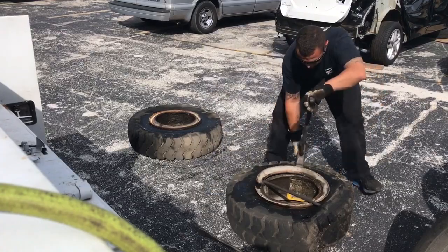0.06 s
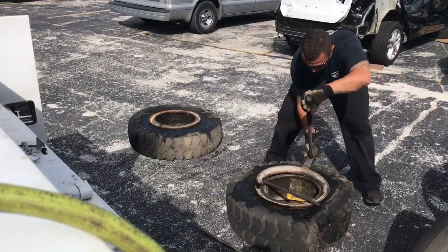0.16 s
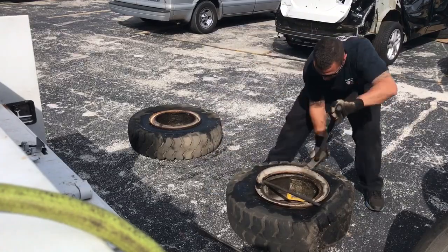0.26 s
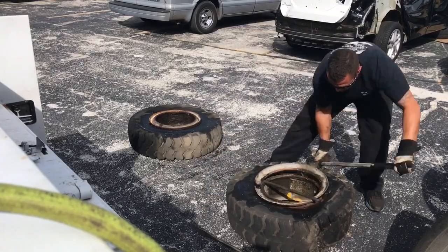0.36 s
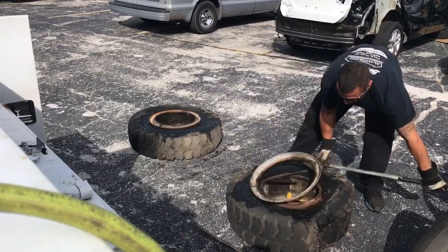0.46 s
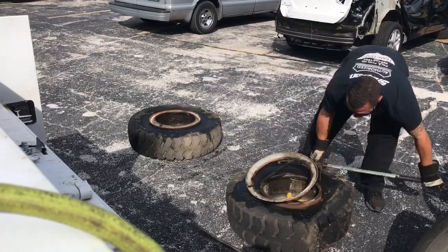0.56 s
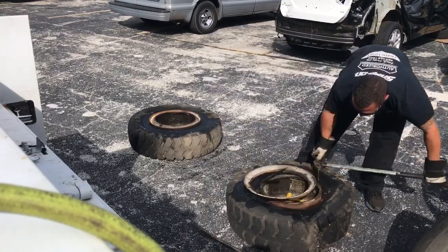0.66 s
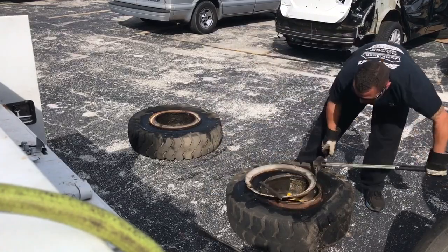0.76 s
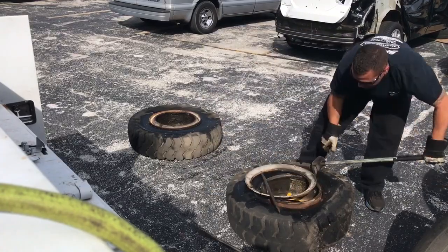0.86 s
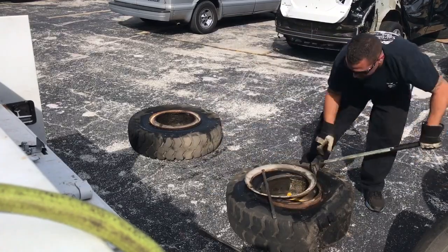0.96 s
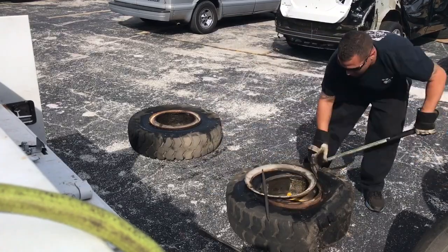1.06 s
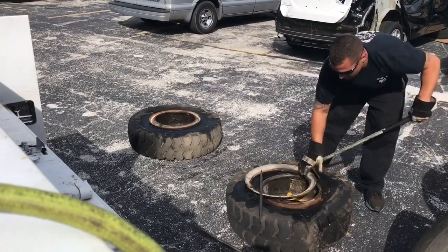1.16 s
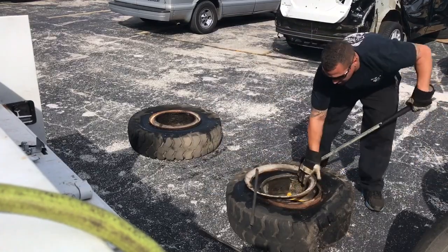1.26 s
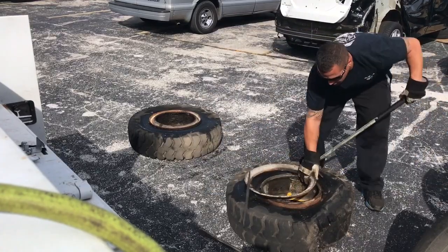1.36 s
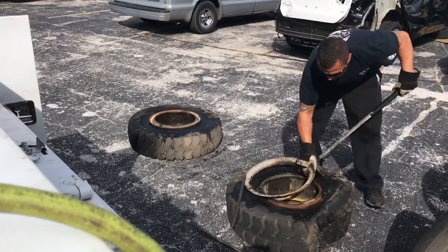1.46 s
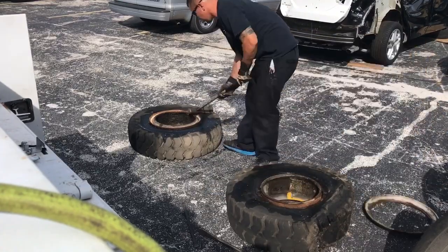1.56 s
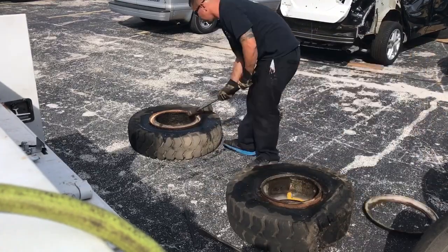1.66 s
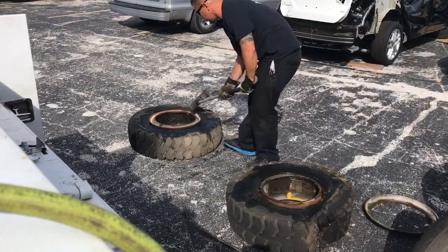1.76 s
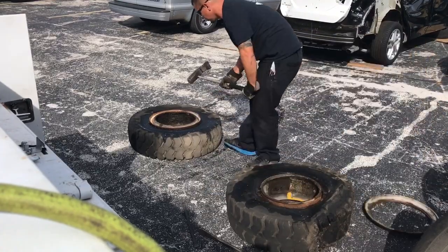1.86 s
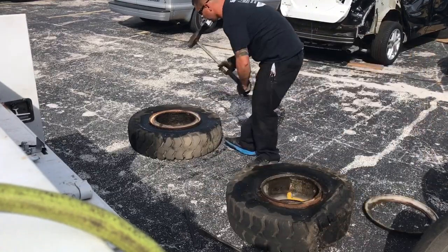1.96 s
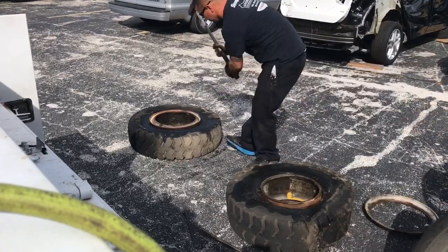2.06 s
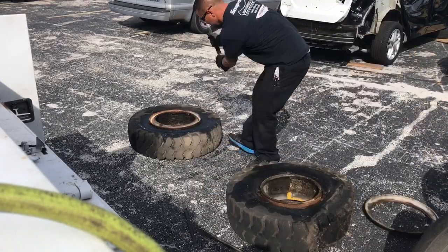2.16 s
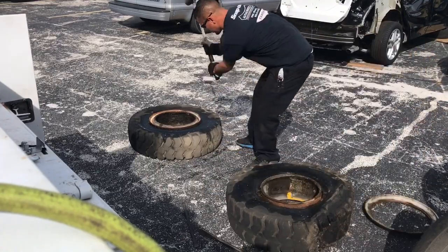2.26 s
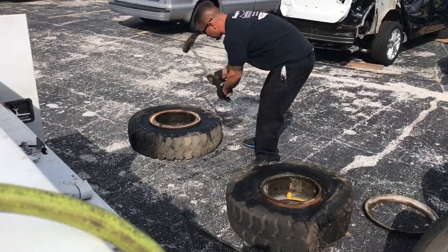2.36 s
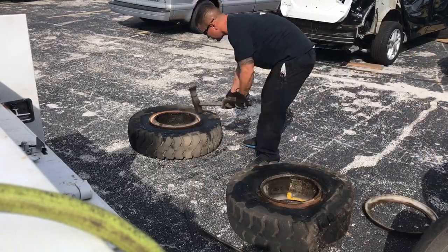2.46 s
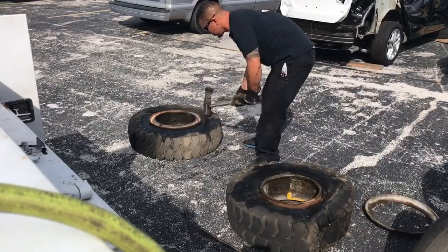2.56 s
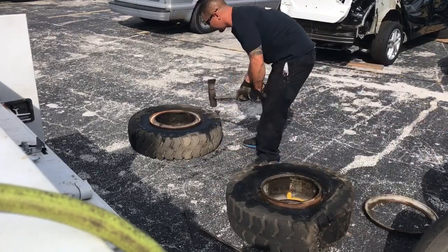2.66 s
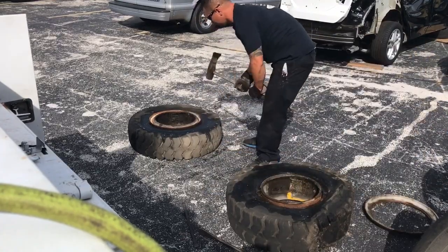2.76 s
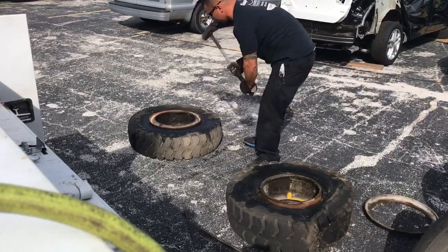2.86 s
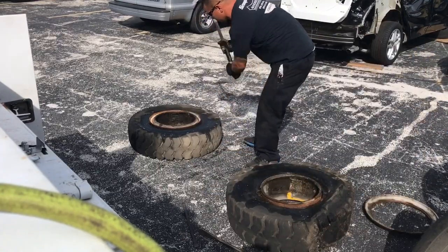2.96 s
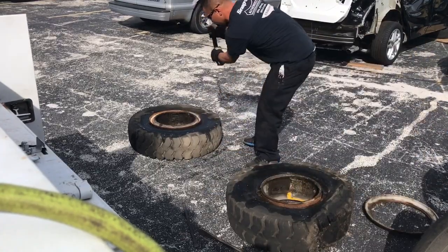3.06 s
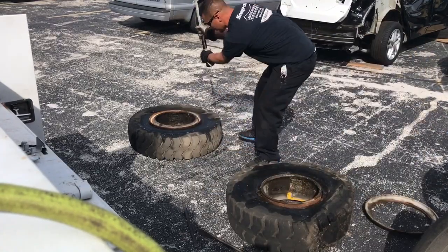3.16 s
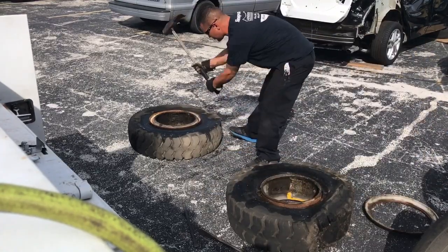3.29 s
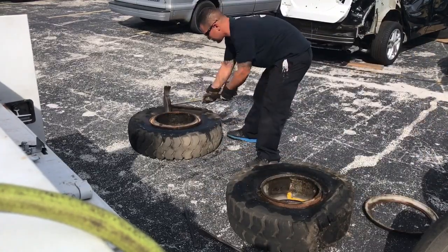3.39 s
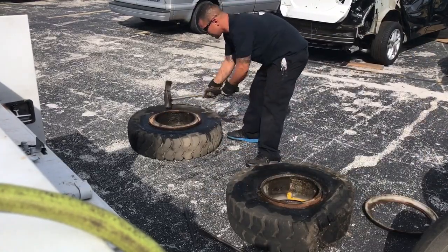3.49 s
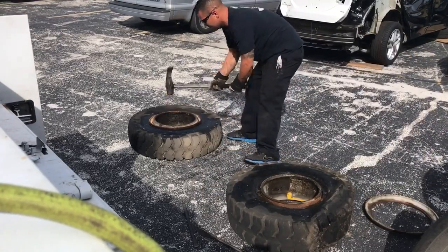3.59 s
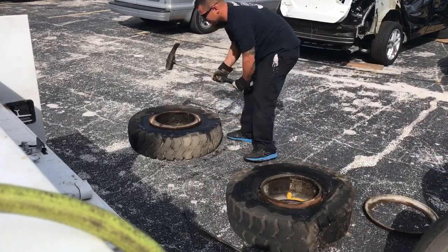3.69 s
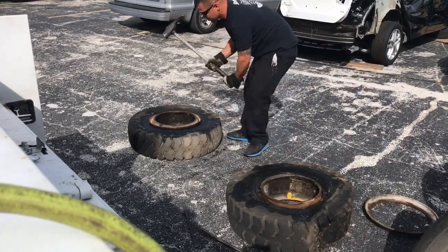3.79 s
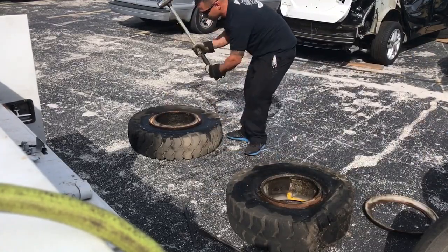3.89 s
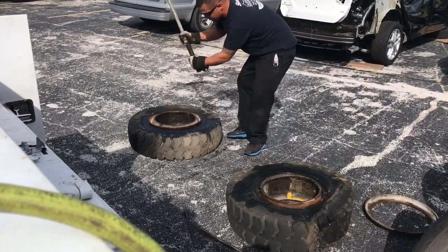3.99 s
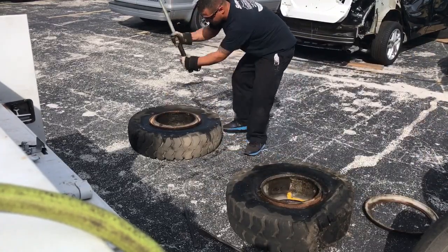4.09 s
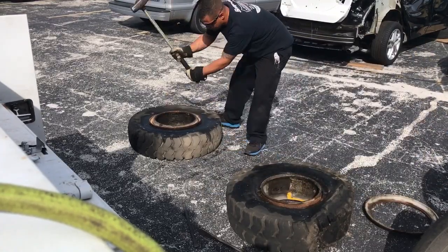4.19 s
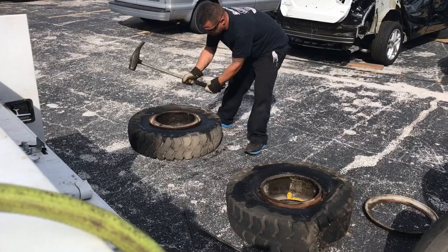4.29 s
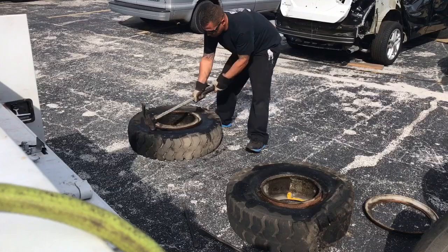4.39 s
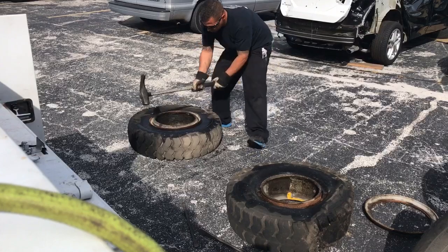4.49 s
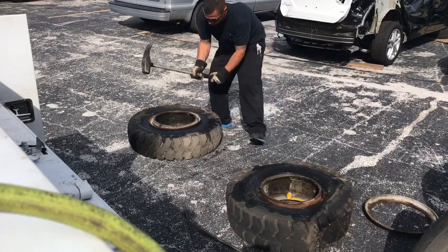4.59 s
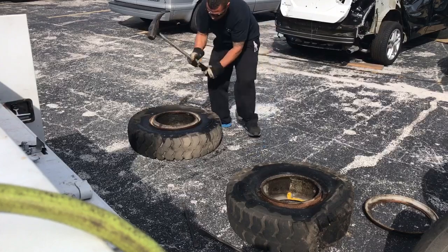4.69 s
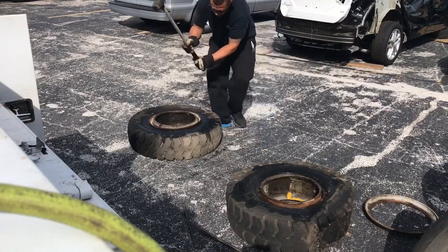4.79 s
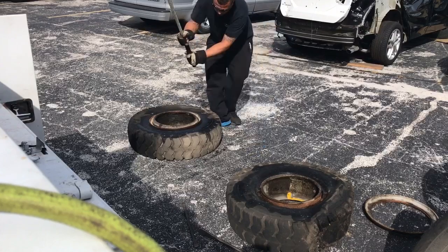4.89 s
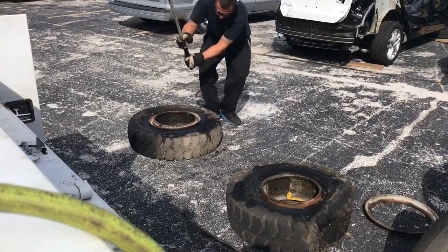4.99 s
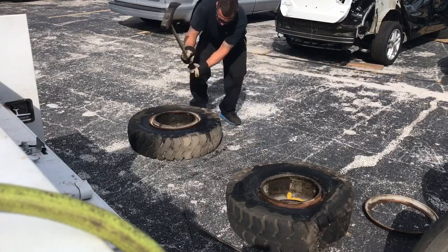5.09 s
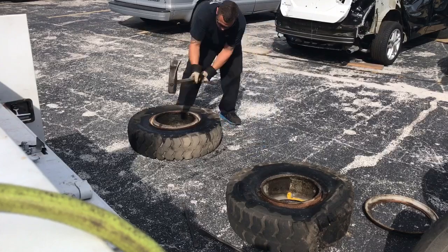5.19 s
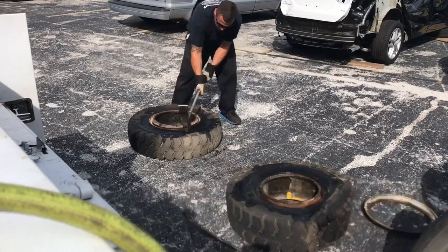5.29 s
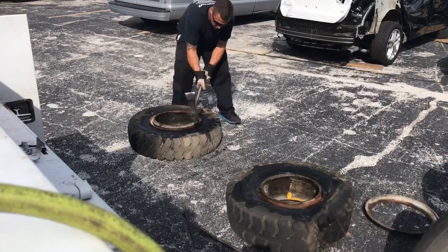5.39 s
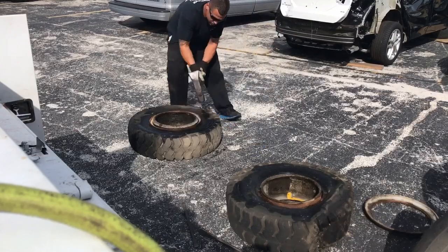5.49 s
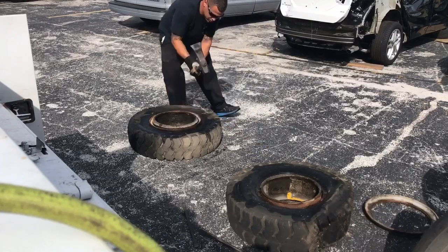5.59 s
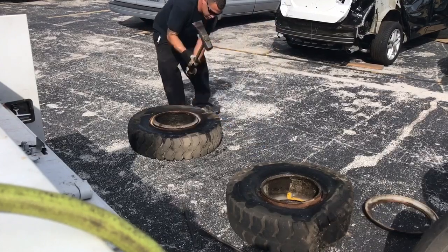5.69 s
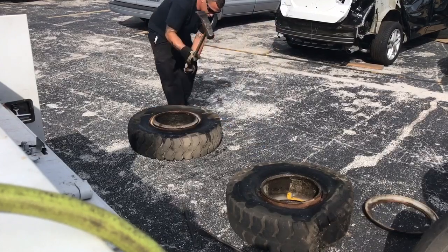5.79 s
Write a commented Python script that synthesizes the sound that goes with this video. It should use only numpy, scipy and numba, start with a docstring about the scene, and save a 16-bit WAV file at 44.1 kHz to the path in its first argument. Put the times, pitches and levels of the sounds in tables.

```python
"""A steel iron pries the lock ring off a truck wheel, close by in an asphalt yard: knocks, a slip, a
rubbing squeal and ringing clangs that stop abruptly. Then a sledge strikes a second tyre's bead four
times: crack, tyre thump and bounce, rim ring and echoes off cars and buildings. Wind buffets the single
phone microphone over distant traffic, and its limiter squeezes the blows."""
import sys
import numpy as np
from scipy import signal
from scipy.fft import rfft, irfft
from scipy.io import wavfile
from scipy.ndimage import uniform_filter1d
from numba import njit

SR = 44100
rng = np.random.default_rng(int(sys.argv[2]) if len(sys.argv) > 2 else 0)


def to_wav(s):
    """Save 16-bit WAV."""
    ch = np.atleast_2d(s).T  # columns
    pcm = np.round(np.clip(ch, -1, 1) * 32767)  # PCM
    wavfile.write(sys.argv[1], SR, pcm.astype(np.int16))


N = 257544
CLANGS_END_S = 1.639

# sledge blows: (time [s], level [dB], thump gain [dB], thump centre [Hz], rim gain [dB], head gain [dB],
# crack centre [Hz], chatter [s], first bounce level [dB], second bounce level [dB])
BLOWS = [(2.539, -11, 6, 148.4, -36.5, -39, 2970, 0.013, -23.5, -29),
         (3.491, -9.5, -1.5, 208, -35.5, -41, 3860, 0.014, -24.5, -33),
         (4.4762, -10.5, -8.5, 129, -29.5, -47, 2560, 0.015, -16.5, -34),
         (5.356, -9.5, -4.5, 77, -27, -44.5, 3170, 0.018, -26, -33)]


def undb(db):
    """Decibels to gain."""
    return 10 ** (np.asarray(db) / 20)


def level(x, db):
    """Scale to an rms level."""
    return x * undb(db) / np.sqrt(np.mean(x ** 2))


def band(x, hz, octaves):
    """Band-pass around a centre."""
    edges = np.clip([hz * 2 ** (-octaves / 2), hz * 2 ** (octaves / 2)], 10, .45 * SR)
    return signal.sosfilt(signal.butter(3, edges, "bandpass", fs=SR, output="sos"), x)


def strike(pitches, modes, times, peak_db, centre_hz, slope_db, scatter_db,
           wobble=0., wobble_hz=30., stop=N / SR):
    """Blows kick each mode, slope_db less per squared octave off centre; loose contact makes it waver."""
    out = np.zeros(N)
    at = (np.asarray(times) * SR).astype(int)
    chance = rng.standard_normal((len(at), 2 * len(modes)))
    span = slice(at[0], int(stop * SR))
    steps = np.arange(span.stop - at[0]) * wobble_hz / SR
    for k, (hz, (db, t60)) in enumerate(zip(pitches, modes)):
        kick = np.zeros(N)
        colour_db = scatter_db * chance[:, 2 * k + 1] - slope_db * np.log2(hz / centre_hz) ** 2
        kick[at] = np.sign(chance[:, 2 * k]) * undb(db + peak_db + colour_db)
        r = 1000 ** (-1 / (max(t60, .01) * SR))
        w = 2 * np.pi * hz / SR
        ring = signal.lfilter([0, r * np.sin(w)], [1, -2 * r * np.cos(w), r * r], kick[span])
        if wobble:
            ring *= np.interp(steps, np.arange(1024), 1 + wobble * rng.standard_normal(1024))
        out[span] += ring
    return out


def add_burst(out, s, db, hz, octaves, rise, t60, hold=0.):
    """Mix in a burst of band noise: short rise, optional hold, exponential fall."""
    t = np.arange(SR) / SR
    noise = level(band(rng.standard_normal(SR), hz, max(octaves, .2)), db)
    attack = 1 - np.exp(-t / max(rise, 1e-4))
    decay = 1000 ** (-np.maximum(t - hold, 0) / max(t60, .005))
    i = int(s * SR)
    out[i:i + SR] += (noise * attack * decay)[:N - i]


def bursts(rows):
    """One noise burst for each row."""
    out = np.zeros(N)
    for row in rows:
        add_burst(out, *row)
    return out


def walk(rate):
    """Random levels held 1 / rate s and smoothed twice; spread near 1."""
    k = int(SR / rate)
    held = np.repeat(rng.standard_normal(N // k + 1), k)
    return 1.3 * uniform_filter1d(uniform_filter1d(held, k), k)[:N]


@njit
def follow(x, release_s):
    """Peak follower: jumps up at once, sinks slowly."""
    release = np.exp(-1 / (release_s * SR))
    peak, envelope = 0., np.empty(len(x))
    for i in range(len(x)):
        peak = max(abs(x[i]), peak * release)
        envelope[i] = peak
    return envelope


def wind():
    """Gusts buffet the microphone in two low bands that throb quickly."""
    # gusts: (time [s], rumble level [dB], flutter level [dB])
    gusts = [(0, -40.5, -54.5), (.3, -54.5, -59.5), (.38, -35, -42), (.7, -39, -42.5), (1.15, -40.5, -43),
             (1.4, -38.5, -41.5), (1.6, -47.5, -52.5), (2.401, -53, -60), (2.7, -46, -49.5),
             (3.099, -46, -61.5), (3.8, -44, -54), (4.249, -50.5, -61.5), (4.899, -42, -62.5),
             (5.4, -48, -57), (5.7, -40, -52), (5.84, -43.5, -54)]
    s, rumble_db, flutter_db = np.transpose(gusts)
    t = np.arange(N) / SR
    rumble = level(band(rng.standard_normal(N), 71.2, 1.55), 0)
    rumble *= undb(np.interp(t, s, rumble_db) + 1.8 * walk(23))
    flutter = level(band(rng.standard_normal(N), 183.6, 1.5), 0)
    flutter *= undb(np.interp(t, s, flutter_db) + 4.5 * walk(30))
    return rumble + flutter


def traffic():
    """Far-off traffic blends into a wash of noise that slowly eases."""
    # traffic spectrum: (frequency [Hz], relative density [dB])
    spectrum = [(88, -19.5), (150, 4.5), (182, -4), (254, -12.5), (334, -4.5), (431, -10.5), (624, -3),
                (1390, -6.5), (2310, -18), (4000, -24), (5050, -31.5), (9630, -34.5), (16000, -38)]
    # slow drift: (time [s], gain [dB])
    drift = [(0.0, 3.5), (5.84, -0.8)]
    hz, db = np.transpose(spectrum)
    bins_hz = np.fft.rfftfreq(N, 1 / SR) + 1
    shape = undb(np.interp(np.log(bins_hz), np.log(hz), db))
    drift_db = np.interp(np.arange(N) / SR, *np.transpose(drift)) + .4 * walk(25)
    wash = irfft(rfft(rng.standard_normal(N)) * shape, N)
    return level(wash, -51) * undb(drift_db)


def contacts():
    """The tools knock, slip, tick and scuff: short contacts without a ring."""
    # dull knocks of iron on tyre: (time [s], level [dB], centre [Hz])
    knocks = [(.0243, -30.5, 1140), (.3428, -25, 1650), (1.667, -39, 2100)]
    # the iron scrapes, then slips off with a crack:
    # (time [s], level [dB], centre [Hz], width [octaves], rise [s], t60 [s])
    slip = [(.441, -25, 2520, 1.9, 0.0017, 0.17), (.455, -14.5, 3460, 3.3, 0.01, 0.13),
            (.4655, -7.5, 2230, 2.8, 0.0026, 0.082)]
    # soft scuffs as the sledge is raised, and faint ticks: (time [s], level [dB], centre [Hz])
    scuffs = [(2.069, -51, 7930), (2.105, -48.5, 8000), (2.39, -54, 6900), (3.91, -48.5, 5960),
              (4.912, -39, 6000)]
    ticks = [(2.265, -50.5, 7070), (3.196, -54, 8610), (4.131, -37, 4330), (4.185, -58.5, 2940),
             (5.11, -57, 3870)]
    # double tick just ahead of each blow: (lead [s], gain on the blow [dB])
    lead_ticks = [(.0228, -27.5), (0.0093, -28.5)]
    out = bursts(slip)
    for s, db, *_ in BLOWS:
        for lead, gain_db in lead_ticks:
            add_burst(out, s - lead, db + gain_db, hz=3500, octaves=1.5, rise=.0006, t60=.038)
    for knock in knocks:
        add_burst(out, *knock, octaves=2.15, rise=.00034, t60=.046)
    for tick in ticks:
        add_burst(out, *tick, octaves=1.8, rise=.00027, t60=.02)
    for scuff in scuffs:
        add_burst(out, *scuff, octaves=2.2, rise=.012, t60=.1)
    return out


def thuds():
    """Scattered low thuds, and the tyre bouncing twice after each blow."""
    # low thuds: (time [s], level [dB], centre [Hz], t60 [s])
    low_thuds = [(0.031, -28.5, 152, 0.11), (.36, -28.5, 77, .3), (.465, -22, 324, 0.15),
                 (.51, -25, 210, 0.41), (0.771, -24.5, 347, 0.44), (1.761, -25.5, 297, 0.031),
                 (3.07, -32, 109, 0.22), (3.396, -21, 128.4, 0.044), (3.966, -24.5, 137, 0.091),
                 (4.419, -25, 70.5, 0.096), (5.18, -17, 72.4, 0.037), (5.821, -37, 150, .1)]
    # tyre bounces: (delay [s], centre [Hz], width [octaves], rise [s], t60 [s])
    bounces = [(0.087, 185, 2.06, 0.0059, 0.086), (.228, 96, 2.06, 0.0049, 0.27)]
    octaves, rise_cycles = 1.74, .6
    out = bursts((s, db, hz, octaves, rise_cycles / hz, t60) for s, db, hz, t60 in low_thuds)
    for s, *_, first_db, second_db in BLOWS:
        for db, (delay, *shape) in zip((first_db, second_db), bounces):
            add_burst(out, s + delay, db, *shape)
    return out


def yard(x):
    """The direct sound, then its echoes scattered off cars and buildings."""
    # echoes: (delay [s], level [dB], centre [Hz], rise [s], t60 [s])
    echoes = [(.012, -52, 2337, .004, 0.26), (0.083, -65.5, 2000, 0.0076, 0.34),
              (0.189, -69, 2223, 0.1, .9), (0.212, -66.5, 4090, 0.0054, 0.15)]
    response = bursts((delay, db, hz, 3.0, rise, t60) for delay, db, hz, rise, t60 in echoes)
    return x + signal.fftconvolve(x, response[:SR + SR // 4])[:N]


def clangs():
    """Iron and lock ring sound together; the ring settles on tyre and glove, choking earlier hits."""
    # lock ring bending in its plane: (pitch [Hz]) and (level [dB], t60 [s])
    bend_hz = [738, 1114, 1365, 1491, 1712, 1933, 2007, 2207, 2272, 2525, 2638, 3138, 3680, 4420, 5114,
               5609, 5805, 5862, 6842, 7111, 8145, 9135, 9986, 12700]
    bend_modes = [(-7, 0.79), (-3.5, 0.47), (-4.5, 0.97), (1.5, 0.47), (1.5, 0.36), (-15.5, 1.2),
                  (-22.5, 1.5), (-21.5, 0.59), (-17, 0.53), (-5.5, 0.13), (-20.5, 1.8), (-11, 0.57),
                  (-8, 0.39), (-10, .6), (-17, 0.29), (-20.5, .3), (-16, 1.4), (-18, 0.63), (-26, 0.22),
                  (-26, 0.21), (-25.5, 0.24), (-23.5, .5), (-19.5, .3), (-27, .3)]
    # lock ring bending and twisting across its plane: (pitch [Hz]) and (level [dB], t60 [s])
    twist_hz = [2132, 2377, 3273, 3757, 4085, 4744, 6336, 6572, 7811, 8479, 8764, 9375, 9755, 11270]
    twist_modes = [(-9, 0.24), (-5, 0.61), (-2, 0.076), (-9, 0.12), (-10, 0.23), (0.5, 0.13), (-11.5, 0.27),
                   (-16, 0.55), (-32, .3), (-35, .4), (-27.5, 0.35), (-15.5, 0.88), (-21, 0.33), (-23, .3)]
    # tyre iron: (pitch [Hz]) and (level [dB], t60 [s])
    iron_hz = [1067, 2810, 4233, 4484, 4608, 5012, 5276, 6150, 6910, 7160, 7407, 7520, 7957, 8581, 9001,
               9658, 10400, 10830, 11390, 11930, 13250, 13730, 14300, 15370, 15630]
    iron_modes = [(-5, 2.9), (4, 0.28), (-4, 0.67), (-1.5, 0.39), (-0.5, 0.35), (-15.5, 0.2), (-0.5, 0.59),
                  (-6.5, 0.15), (-12, 0.69), (-8.5, 0.33), (-13.5, .4), (-7, 0.36), (-24, 0.15),
                  (-12, 0.13), (-15, .5), (-12, .3), (-29, 0.1), (-25.5, 0.16), (-14.5, 1.2), (-16, 0.44),
                  (-21.5, .4), (-14.5, 1.1), (-27, 0.55), (-23, 0.3), (-16, .9)]
    # the iron jingles and rebounds on the ring: (time [s], level [dB], brightest [Hz])
    taps = [(0.172, -51, 4160), (.2, -52, 4180), (0.243, -49.5, 4160), (0.263, -53.5, 4000),
            (.295, -50.5, 3880), (0.414, -38, 5000), (.998, -18.5, 3000), (1.052, -18, 3240),
            (1.097, -25, 3000), (1.137, -32, 3490), (1.252, -33.5, 3000), (1.388, -36, 2860)]
    # hard contacts: (time [s], level [dB], bend gain [dB], twist gain [dB], iron gain [dB], # brightest [Hz],
    # crack gain [dB])
    hard_hits = [(0.47, -31, -7.5, 7, -15, 2164, 2), (0.77, -7.5, 2.5, -2.5, -9, 2924, -8),
                 (0.892, -4.5, -2, -3.5, -4.5, 5000, -2), (1.486, -20, 2, 1, -2, 4000, 5.5),
                 (1.581, -10.5, -8, 7, -3.5, 4000, -25.5)]
    tap_slope_db, hard_slope_db = 6, 3.26  # a light touch excites a narrower range
    grip_s, grip_db_per_s, grip_most_db, iron_grip_share = 1.3, 195.5, 9, .3
    # many weak modes crowd between the strong ones
    crowd = rng.random((120, 3))
    weak_hz = 900 + 14500 * crowd[:, 0] ** 2
    weak_modes = np.transpose([-22 - 12 * crowd[:, 1], .16 + .076 * crowd[:, 2]])
    hits = [(s, db, -7, -7, -14, hz, 6.5, tap_slope_db) for s, db, hz in taps]  # columns as hard_hits
    hits += [(*hit, hard_slope_db) for hit in hard_hits]
    hits = np.array(sorted(hits))
    early = hits[:, 0] < grip_s
    grip_db = np.clip(grip_db_per_s * (np.arange(N) / SR - grip_s), 0, grip_most_db)
    out = np.zeros(N)
    for rows, loss_db in (hits[early], grip_db), (hits[~early], 0):
        s, db, bend_db, twist_db, iron_db, hz, crack_db, slope_db = rows.T
        touch = dict(centre_hz=hz, slope_db=slope_db, stop=CLANGS_END_S)
        waver = dict(scatter_db=1, wobble=.36, wobble_hz=70)
        ring = strike(bend_hz, bend_modes, s, db + bend_db - 8, **touch, **waver)
        ring += strike(twist_hz, twist_modes, s, db + twist_db - 8, **touch, **waver)
        iron = strike(iron_hz, iron_modes, s, db + iron_db - 8, **touch, **waver)
        ring += strike(weak_hz, weak_modes, s, db + crack_db, scatter_db=4.5, **touch)
        for at, hit_db, centre_hz, slope in zip(s, db + crack_db, hz, slope_db):
            octaves = 1 if slope == tap_slope_db else 5.1
            add_burst(ring, at, hit_db - 18.5, centre_hz, octaves, .0004, .04)  # crack
            add_burst(ring, at, hit_db - 23.5, .78 * centre_hz, 2.2, .004, .35)  # loose parts buzz
        out += ring * undb(-loss_db) + iron * undb(-iron_grip_share * loss_db)
    return out


def squeal():
    """The iron rubs the ring, and two pairs of close modes sing and beat."""
    # mode pairs: (pitch [Hz], base level [dB])
    high_pair = [(5859, -47), (5877, -48)]
    low_pair = [(3138, -45), (3152, -51)]
    # rubbing: (time [s], high pair gain [dB], low pair gain [dB])
    rubbing = [(1.12, -35.5, -18), (1.17, -12.5, -5), (1.221, 13, 2.5), (1.28, -19, 3.5), (1.332, -3, -16),
               (1.4, -2.5, -26), (1.49, -42, -50), (1.598, -35, -42)]
    t = np.arange(N) / SR
    s, *gains_db = np.transpose(rubbing)
    out = np.zeros(N)
    for pair, gain_db in zip((high_pair, low_pair), gains_db):
        tones = sum(np.sqrt(2) * undb(db) * np.sin(2 * np.pi * (hz * t + rng.random())) for hz, db in pair)
        out += tones * undb(np.interp(t, s, gain_db, left=-99, right=-99))
    return out


def sledge():
    """The head chatters on the bead and cracks; tyre, rim and head ring on."""
    # air in the tyre and its walls: (pitch [Hz]) and (level [dB], t60 [s])
    tyre_hz = [45, 70, 125, 197, 320, 435, 570]
    tyre_modes = [(2, 0.104), (5, 0.1), (3.5, 0.14), (-3, 0.14), (0.5, 0.087), (-11.5, 0.16), (3, 0.085)]
    # second wheel's rim: (pitch [Hz]) and (level [dB], t60 [s])
    rim_hz = [1125, 1615, 2008, 2275, 2370, 2620, 2765, 2990, 3310, 3620, 3695, 3825, 4160, 4550, 5345,
              5530, 5830, 6600, 7483, 7666, 8415, 8861, 9313, 12630]
    rim_modes = [(-3, 0.12), (7, 0.072), (-0.5, 0.23), (-13.5, 1.4), (-4, 0.89), (-8, 1.2), (-5.5, 1.07),
                 (-18, 0.45), (3, 0.22), (-6, 1), (-17, 0.4), (-39, 0.34), (6.5, 0.12), (-6, 1.1),
                 (-8, 0.68), (-12.5, 0.85), (-9, 0.42), (-4.5, 0.44), (-9.5, 0.58), (-30.5, 0.29),
                 (-11.5, 0.6), (-5, 0.16), (-24.5, 0.3), (-24.5, 0.36)]
    # sledge head: (pitch [Hz]) and (level [dB], t60 [s])
    head_hz = [11470]
    head_modes = [(-0.54, 0.63)]
    s, db, thump_db, thump_hz, rim_db, head_db, crack_hz, chatter, *_ = np.transpose(BLOWS)
    out = strike(tyre_hz, tyre_modes, s + .00329, db + thump_db, thump_hz, 1.38, 1.5, .53, wobble_hz=90)
    out += strike(rim_hz, rim_modes, s, db + rim_db, crack_hz, .5, .76, .8, wobble_hz=160)
    out += strike(head_hz, head_modes, s, db + head_db, head_hz[0], 0, 0, .334, wobble_hz=40)
    # while the head still presses, the rim's modes start loud and die fast
    pressed = [(mode_db, .11 * t60) for mode_db, t60 in rim_modes]
    out += strike(rim_hz, pressed, s + .003, db + rim_db + 26, crack_hz, .48, .93, .8, wobble_hz=200)
    for at, blow_db, low_db, hz, hold in zip(s, db, db + thump_db, crack_hz, chatter):
        add_burst(out, at, blow_db + 2, 4200, 1.5, .0002, .015)  # click
        add_burst(out, at + .0027, blow_db - 7, 1200, 1.5, .002, .12)  # knock
        add_burst(out, at, blow_db - .5, hz, 1.1, .0005, .05, hold)  # crack
        add_burst(out, at, blow_db - 11, 2500, 3.5, .0005, .09, hold)  # broad chatter
        add_burst(out, at, blow_db - 19.5, 10000, 1.4, .0003, .09, hold / 2)  # sizzle
        add_burst(out, at, low_db - 12, 350, 2.4, .002, .09, hold)  # thump
    return out


def scene():
    """All sources at one microphone; clangs, squeal and their echoes stop together."""
    cutoff = np.clip((CLANGS_END_S - np.arange(N) / SR) / .0069, 0, 1)
    prying = yard(clangs() + squeal()) * cutoff
    impacts = yard(sledge() + contacts())
    return (prying + impacts + thuds() + wind() + traffic())[None]


def record(dry):
    """The phone trims deep bass and top; slow gain control ducks after hits, a limiter flattens peaks."""
    low_hz, top_hz, drive_db = 33.6, 15900, 2
    duck_threshold, duck_power, ceiling = .48, .14, .66
    low_cut = signal.butter(2, low_hz, "highpass", fs=SR, output="sos")
    top_cut = signal.ellip(10, .2, 80, top_hz, fs=SR, output="sos")
    x = signal.sosfilt(low_cut, dry[0]) * undb(drive_db)
    slow_peak = uniform_filter1d(follow(x, release_s=.45), size=441)
    x *= np.minimum(duck_threshold / slow_peak, 1) ** duck_power
    x = signal.sosfilt(top_cut, x)
    x *= np.minimum(ceiling / follow(x, release_s=.021), 1)
    return signal.sosfilt(top_cut, x)[None]


dry = scene()
out = record(dry)
to_wav(out)
```